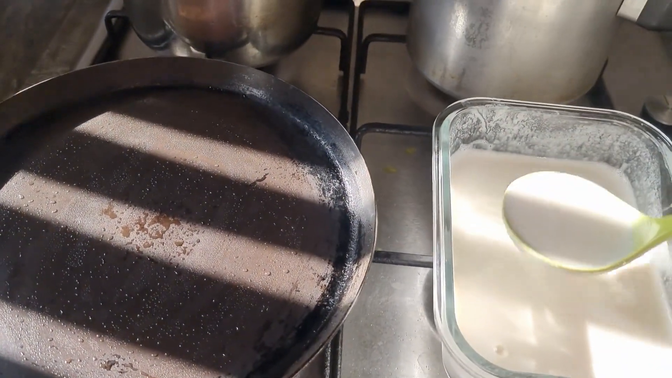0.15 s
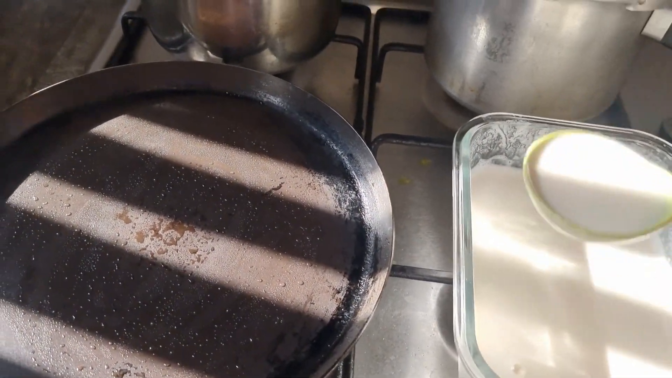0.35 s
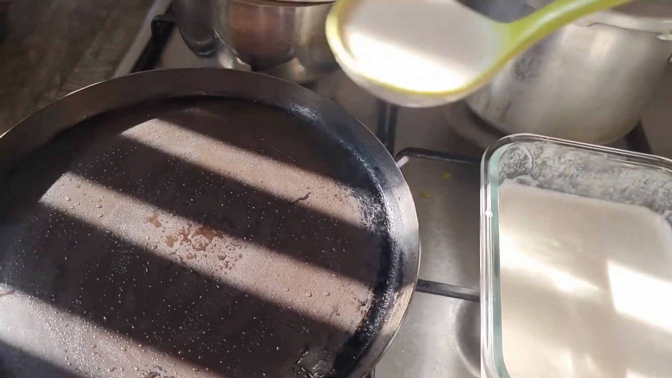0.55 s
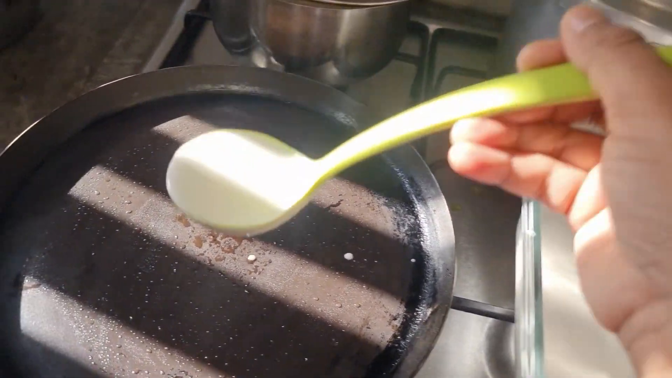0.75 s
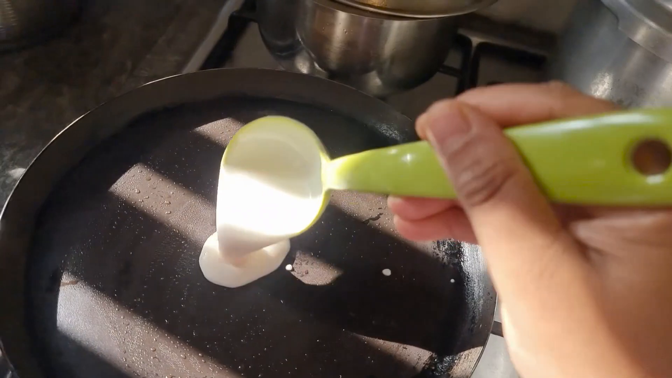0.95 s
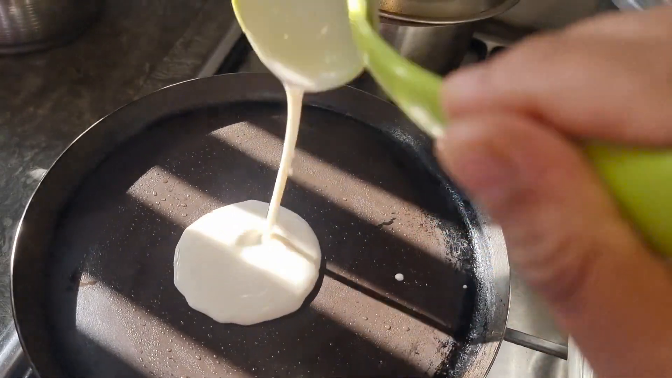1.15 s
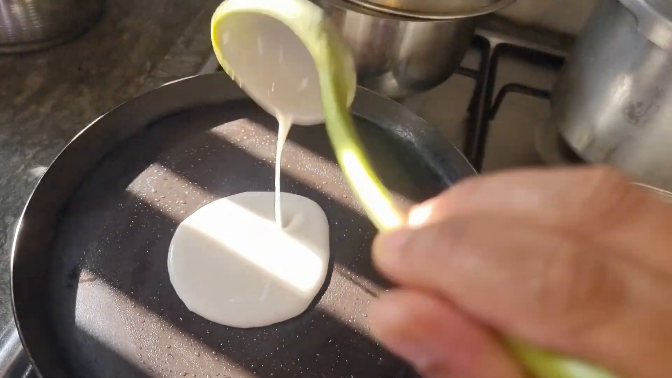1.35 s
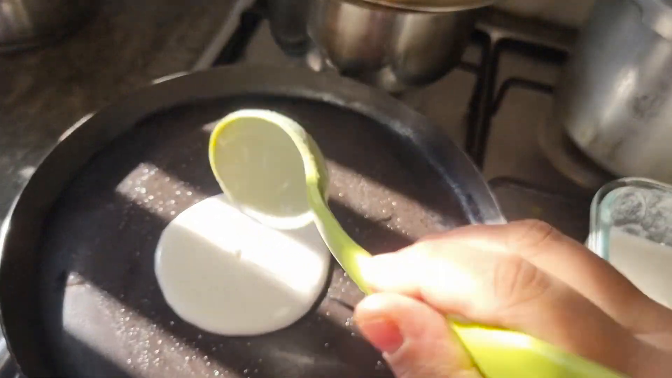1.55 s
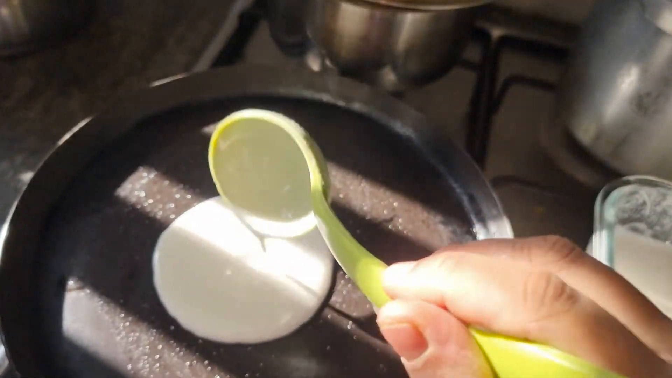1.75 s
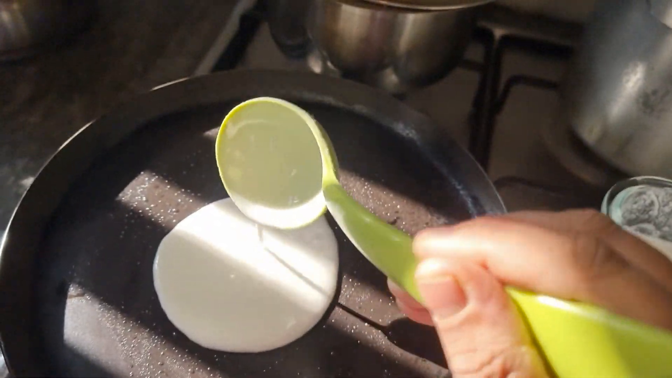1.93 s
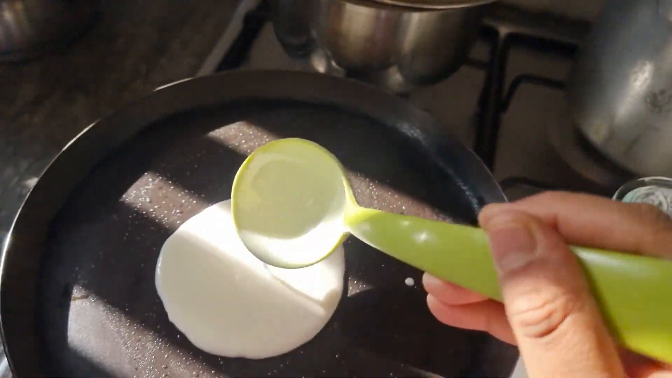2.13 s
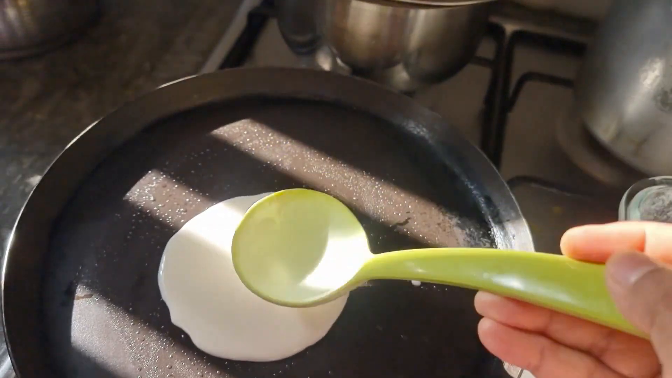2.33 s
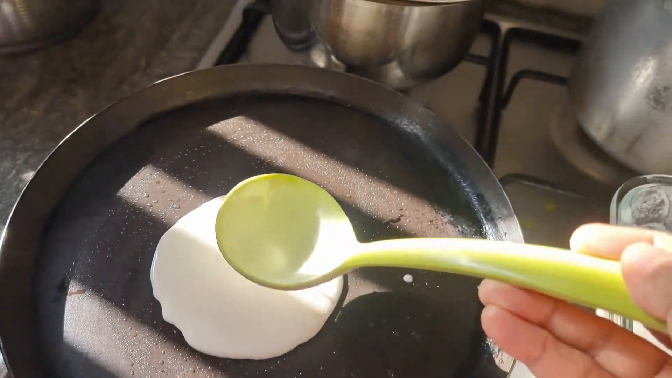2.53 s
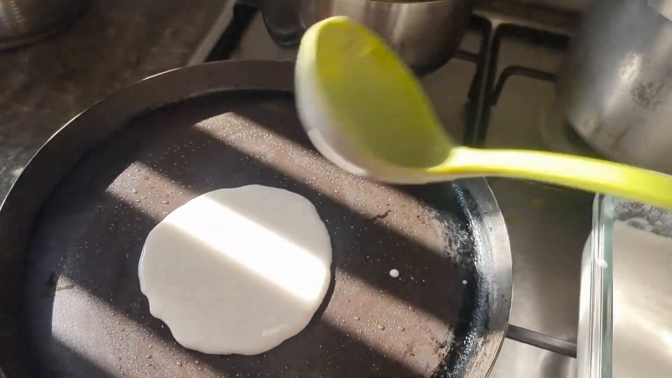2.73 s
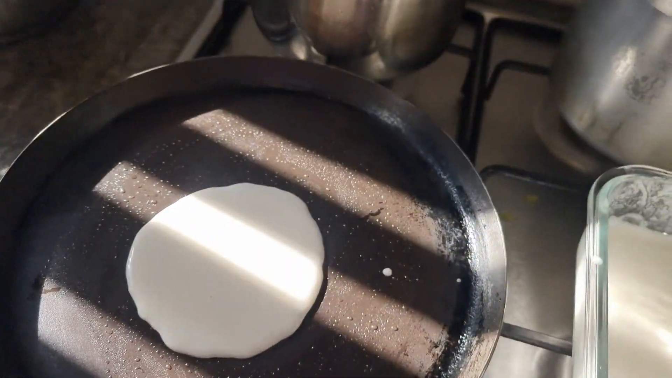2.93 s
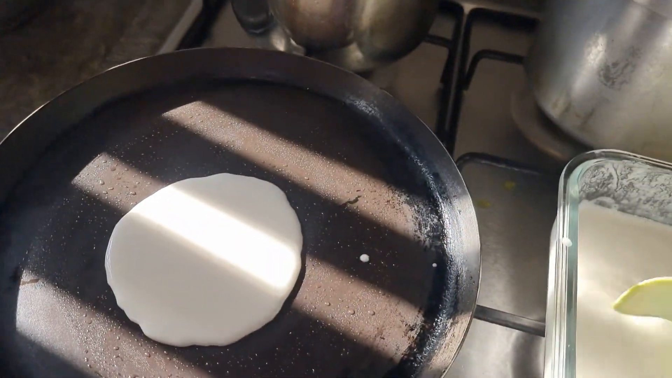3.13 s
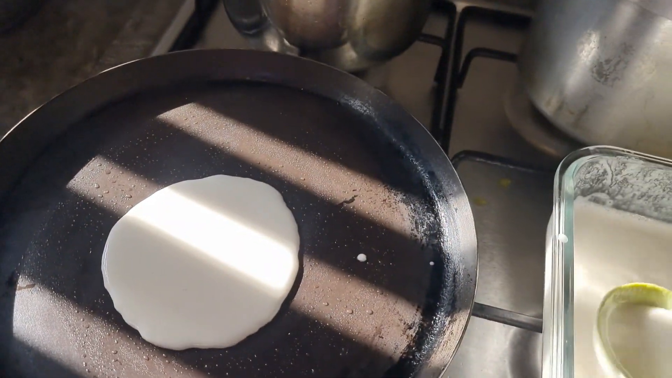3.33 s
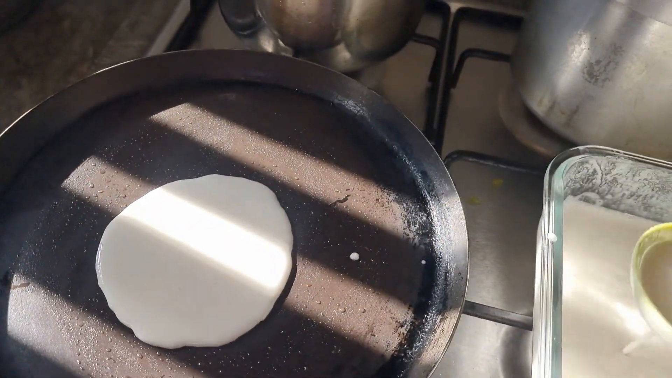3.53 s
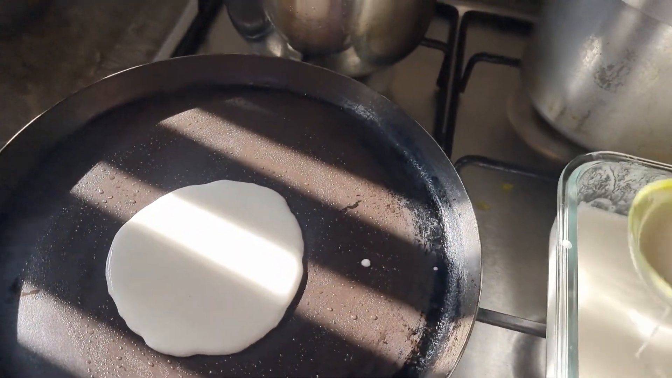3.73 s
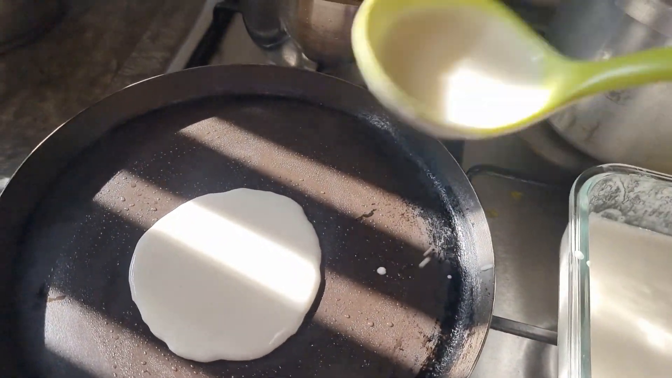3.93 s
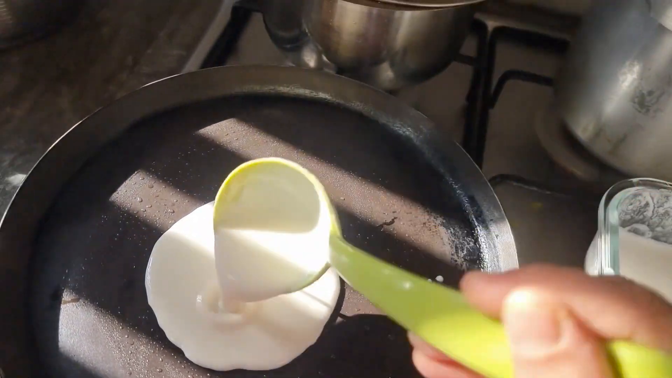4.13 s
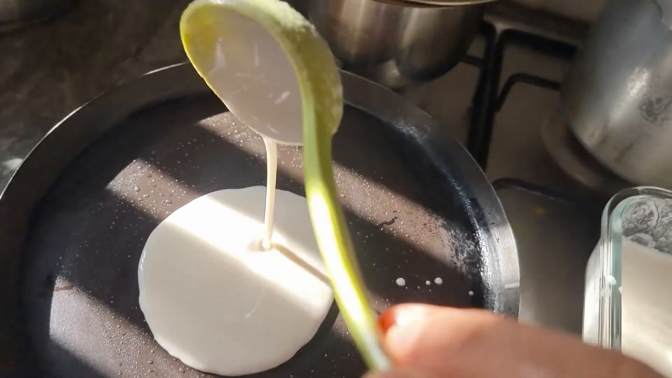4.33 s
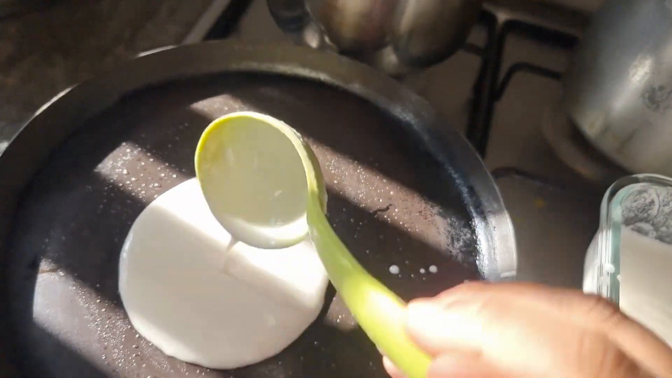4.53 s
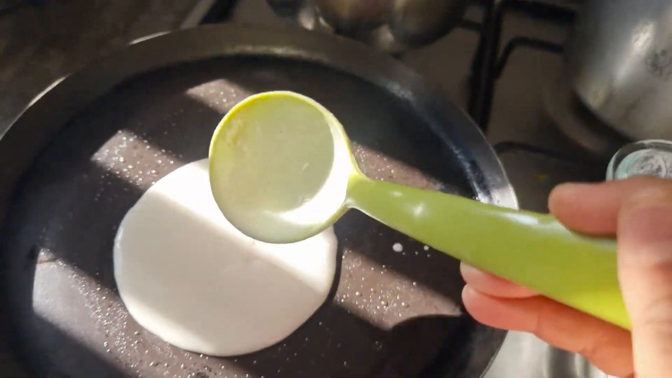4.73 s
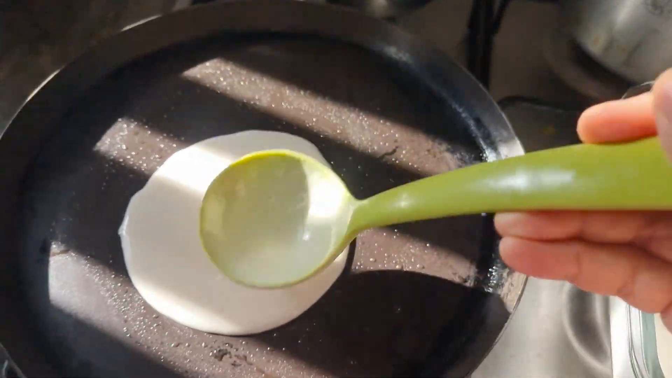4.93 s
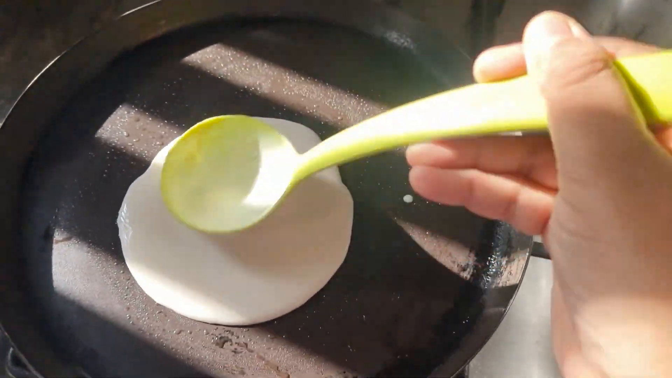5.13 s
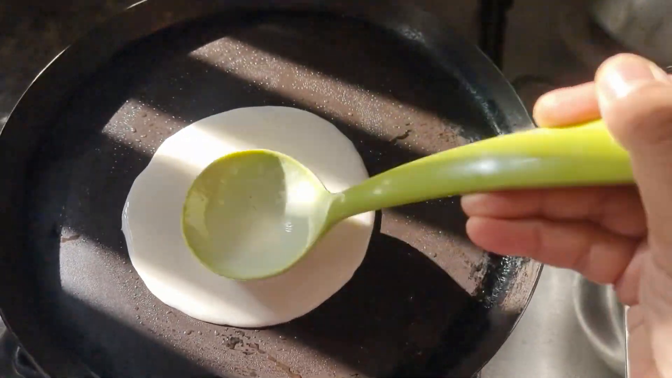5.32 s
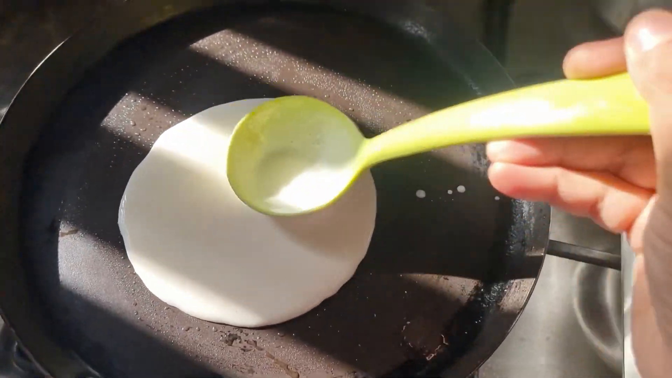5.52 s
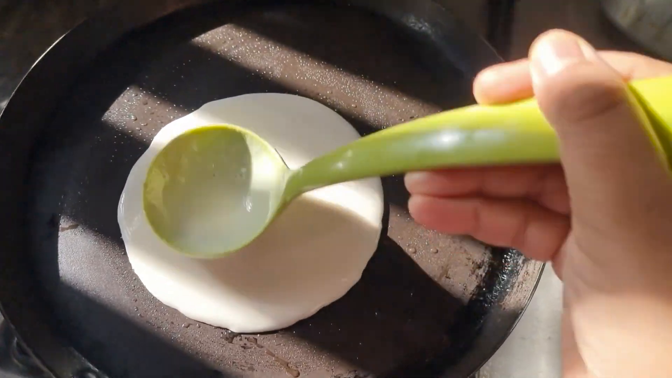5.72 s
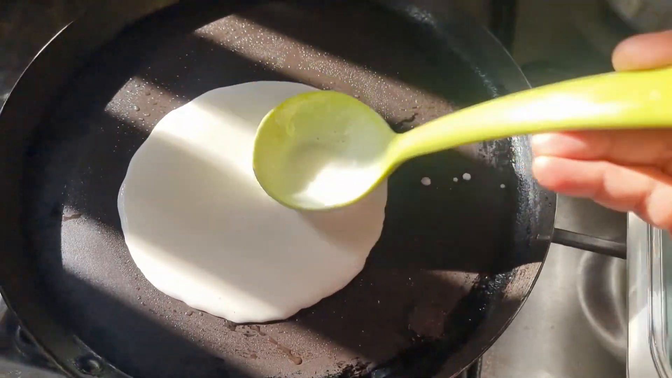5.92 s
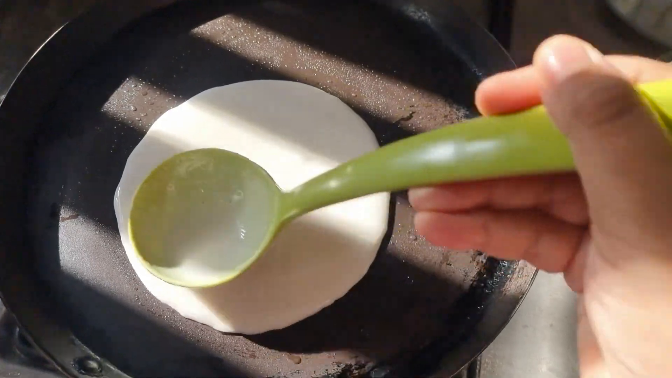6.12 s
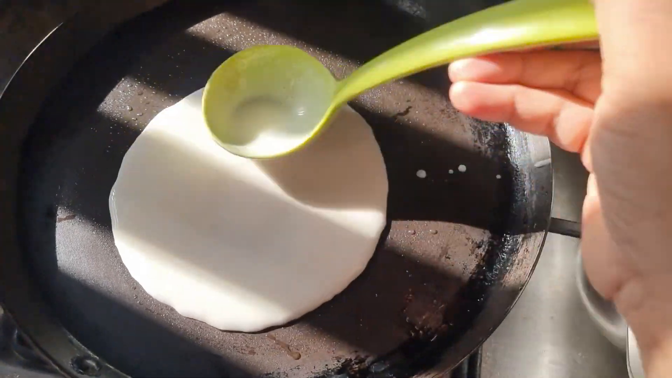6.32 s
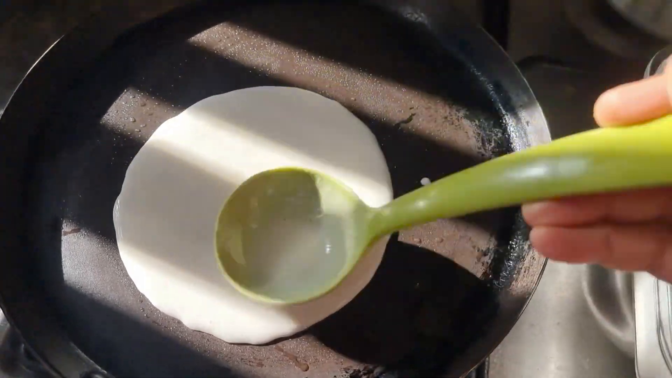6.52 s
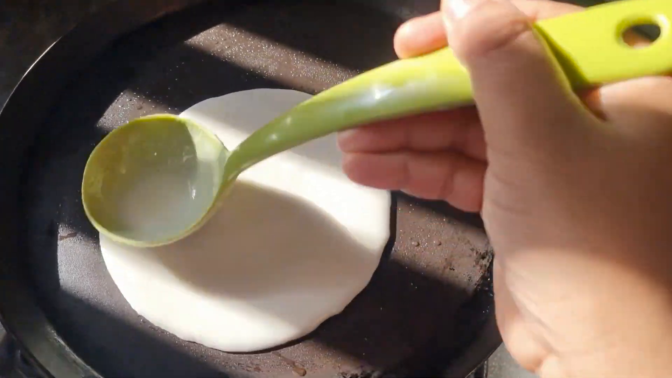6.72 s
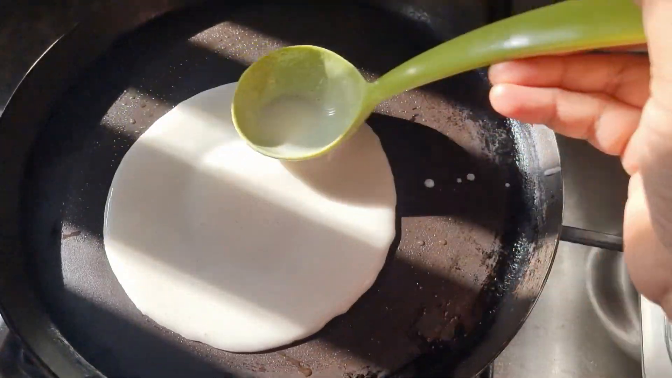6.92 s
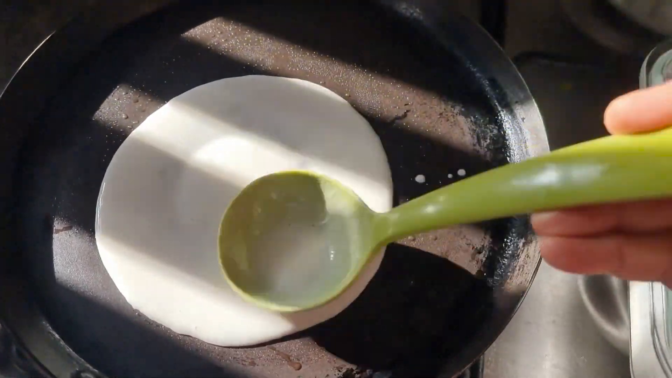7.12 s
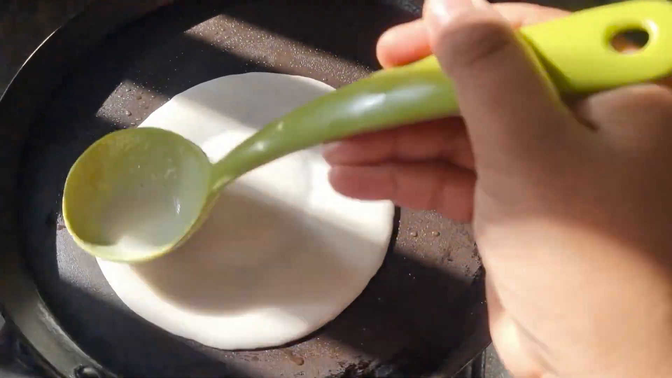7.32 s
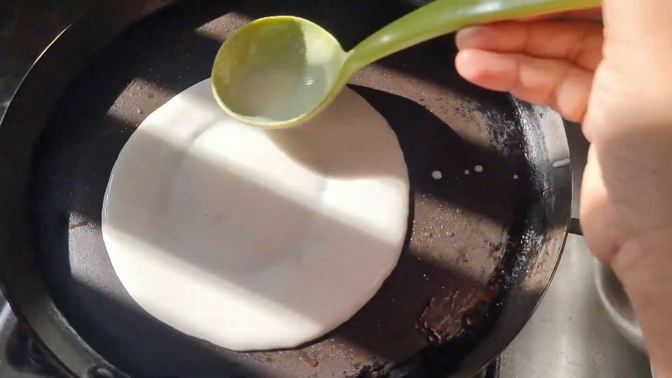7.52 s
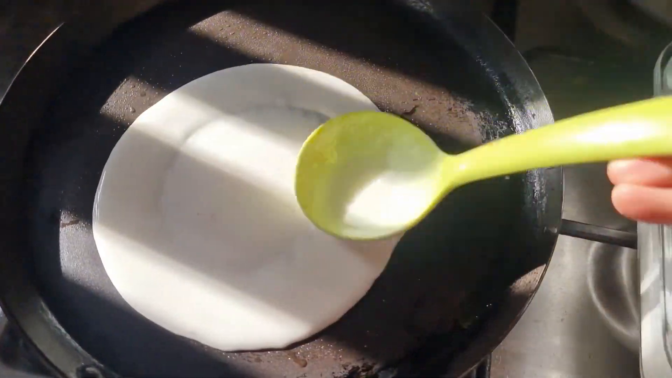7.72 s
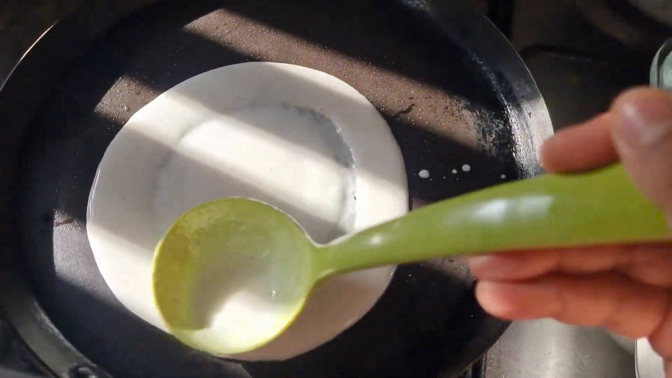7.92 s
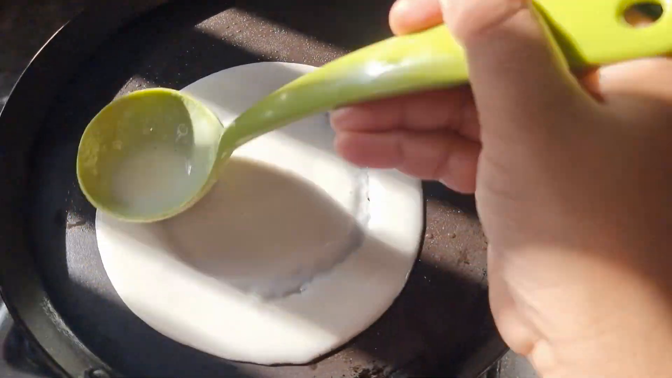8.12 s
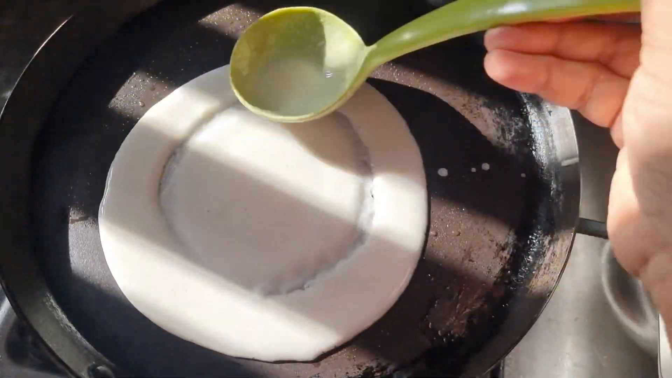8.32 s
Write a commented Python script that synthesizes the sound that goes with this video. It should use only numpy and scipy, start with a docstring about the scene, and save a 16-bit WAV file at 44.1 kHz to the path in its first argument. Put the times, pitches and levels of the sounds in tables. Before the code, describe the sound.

Batter pours onto a hot flat pan with a sudden bright sizzle that fades to crackle, swells with a second ladle, then pulses as it is spread.

```python
"""Batter sizzles on a hot flat pan: two ladles are poured and spread in circles.
Steam bursts from under it in thousands of tiny clicks that ring the pan and thin out as the batter sets;
each turn of the ladle pushes batter onto fresh metal and revives them. Single spits are louder cracks.
Filtered noise makes the faint gas burner underneath, and short decaying rings the knocks of ladle and dish.
Echoes of a small kitchen surround the sizzle and the spits, heard close up in stereo."""
import sys
import numpy as np
from scipy import signal
from scipy.fft import rfft, irfft, next_fast_len
from scipy.io import wavfile

SR = 44100
rng = np.random.default_rng(int(sys.argv[2]) if len(sys.argv) > 2 else 0)


def unload_audio(sound):
    """Save the sound as a 16-bit wav file, at the path given as the first command line argument."""
    columns = np.transpose(np.atleast_2d(sound))
    # keep every value between -1 and 1, then stretch to whole-number steps
    steps = np.round(np.clip(columns, -1, 1) * 32767)
    wavfile.write(sys.argv[1], SR, steps.astype(np.int16))


N = 373086
TIME = np.arange(N) / SR


def amp(db):
    """Turns decibels into a plain factor."""
    return 10 ** (np.asarray(db) / 20)


def evened(x):
    """Scales to an rms of 1."""
    return x / np.sqrt(np.mean(x ** 2) + 1e-20)


def read(points, hz):
    """Reads a table between its points, with pitch on a log axis as the ear hears it."""
    f, value = np.transpose(points)
    return np.interp(np.log(hz + 1), np.log(f + 1), value)


def add(mix, s, sound):
    """Mixes a sound in at time s."""
    part = mix[..., round(s * SR):][..., :sound.shape[-1]]
    part += sound[..., :part.shape[-1]]


def colour(x, points, size=4096):
    """Filters to the given spectrum without sounding early, so that clicks keep their sharp front."""
    log_gain = np.log(amp(read(points, abs(np.fft.fftfreq(size, 1 / SR)))))
    # the minimum-phase filter: all its energy comes as early as possible
    taps = np.fft.ifft(np.exp(signal.hilbert(log_gain).conj())).real[:size // 2]
    return np.apply_along_axis(lambda v: signal.oaconvolve(v, taps)[:len(v)], -1, x)


def resonate(x, hz, width_hz):
    """One damped mode, as a band-pass: the wider it is, the sooner it dies away."""
    return signal.lfilter(*signal.iirpeak(hz, hz / width_hz, SR), x)


def wander(per_s):
    """Slow random curve of rms 1 that turns about per_s times a second."""
    size = next_fast_len(N, real=True)
    hz = np.fft.rfftfreq(size, 1 / SR)
    slow = rfft(rng.standard_normal(size)) * np.exp(-(hz / per_s) ** 2)
    return evened(irfft(slow, size)[:N])


def bursts(per_s, spread_db):
    """Random clicks, many small and a few large; their power does not depend on their rate."""
    chance, sign = rng.random(N), rng.choice([-1., 1.], N)
    size = np.minimum(rng.exponential(1, N), 3.5)
    clicks = (chance < per_s / SR) * sign * amp(spread_db * size)
    return evened(clicks / np.sqrt(per_s))


# how long the kitchen's tail takes to fall by 60 dB: (f/Hz, t60/s)
ROOM_DECAY = [(210, 0.12), (1520, 0.14), (5050, 0.12), (15100, 0.26)]


def kitchen(x, near_db=3.0, near_s=0.0025, room_db=5.5):
    """One spot on the pan in stereo: direct sound, quick echoes off pots and hob, a short tail from the walls."""
    t = np.arange(SR // 5) / SR
    near, far = rng.standard_normal((2, 2, len(t)))
    near = near * (t > .0004) * np.exp(-t / near_s)
    near = colour(near, [(600, -25.0), (1500, -4), (4000, -3.5)])  # pots hardly reflect long waves
    hz, at, z = signal.stft(far * (t > .005), SR, nperseg=256)
    fade = amp(-60 * at / read(ROOM_DECAY, hz)[:, None])
    far = signal.istft(z * fade, SR, nperseg=256)[1][:, :len(t)]
    echo = amp(near_db) * near / np.linalg.norm(near[0]) + amp(room_db) * far / np.linalg.norm(far[0])
    echo[[0, 1], [rng.integers(2, 5), 0]] += 1  # direct sound, 2 to 4 samples later on the left
    return signal.oaconvolve(x[None], echo / np.linalg.norm(echo[0]), axes=1)[:, :len(x)]


# spectrum of the flame's rush: (f/Hz, level/dB)
FLAME_RUSH = [(21, -26), (50, -15.5), (80, 0), (102, -5), (148, 2), (228, -14.5), (292, -7.5), (455, -16),
              (605, -15), (1010, -16), (1710, -12.5), (2410, -16.5), (2850, -31), (5050, -33), (9100, -41),
              (12100, -50)]
# whistles of the gas jet: (f/Hz, nominal width/Hz, level/dB in each of two flame sounds)
JET_WHISTLES = [(1920, 19, -88), (2000, 64, -75.5), (2566, 35, -80), (3200, 70, -83), (6280, 59, -88.5)]


def burner(apart=0.59, rush_db=-69.5, right_db=-4.0):
    """The flame rushes and its jet whistles faintly: filtered noise, partly alike in both ears."""
    def flame():
        """Broad noise for the rush, narrow bands of another noise for the whistles."""
        noise = rng.standard_normal(N)
        whistles = sum(amp(db) * evened(resonate(resonate(noise, hz, 2 * w), hz, 2 * w))
                       for hz, w, db in JET_WHISTLES)
        return amp(rush_db) * evened(colour(rng.standard_normal(N), FLAME_RUSH)) + whistles
    shared, side = flame(), flame()
    return np.array([shared + apart * side, amp(right_db) * (shared - apart * side)])


# soft knocks of ladle and dish, and batter dripping back into it: (t/s, level/dB, f/Hz, t60/s)
SOFT_KNOCKS = [(.145, -72, 455, .35), (.398, -69, 310, .12), (.402, -73, 740, .1), (.425, -72, 410, .2),
               (.515, -71, 765, .18), (.559, -55, 680, .07), (.56, -62, 790, .06), (.56, -64, 480, .03),
               (.588, -68, 490, .1), (3.062, -54, 262, 0.21), (3.068, -56, 203, 0.2),
               (3.074, -58.5, 76, .2), (7.641, -61, 78.4, 0.17)]


def knocks(rise_s=0.0012, width=0.26, blur_db=-6):
    """Dull, cushioned blows, each a short ring blurred by the batter."""
    out, t = np.zeros(N), np.arange(SR // 3) / SR
    for s, db, hz, t60 in SOFT_KNOCKS:
        noise = rng.standard_normal(len(t))
        blur = evened(resonate(resonate(noise, hz, width * hz), hz, width * hz))
        ring = np.sin(2 * np.pi * hz * t) + amp(blur_db) * blur
        add(out, s, ring * amp(db - 60 * t / t60) * (1 - np.exp(-t / rise_s)))
    return out


SEAT_SHARE = 0.11  # share of each rise that the batter takes to seat on the metal


def swell(start_s, rise_s, fade_db_per_s):
    """Power grows with the wetted area, then fades as the batter sets."""
    age = TIME - start_s
    seated = np.clip(age / (SEAT_SHARE * rise_s), 0, 1) ** 2
    wetted = np.clip(age / rise_s, 0, 1) * seated
    return wetted * amp(-fade_db_per_s * np.maximum(age - rise_s, 0)) ** 2


# batter meets hot metal: three drips, the first ladle as it lands and as its pool widens, then the second
# (t/s, time to spread/s, level/dB, brightness/dB per octave)
BATTER_POURS = [(.6, .12, -38, 14), (.662, .02, -24.6, 10.5), (.765, .07, -16.2, 5.5), (.83, .25, -2.4, 2),
                (1.14, .17, -2.2, -.7), (4.35, .36, -6.3, 1.5)]
# the circling ladle pushes batter onto fresh metal: (t/s, level/dB, brightness/dB per octave)
LADLE_STROKES = [(5.23, .8, 1.6), (5.55, -.7, -.9), (6.1, -.6, .3), (6.5, -4, -.5), (7.2, -7.5, -.5),
                 (7.68, -2.5, 1), (7.92, -2.5, .5)]
STROKE_RISE_S, STROKE_FADE_DB_PER_S = 0.083, 4
# the ladle hovers over the pool and screens the treble: (t/s, half length/s, loss/dB at SHADE_HZ)
LADLE_SHADES = [(4.167, 0.12, 2), (5.1, 0.16, 2), (7.02, 0.12, 2.5)]
SHADE_HZ = 11800
# small bubbles; columns as for the other voices below. Brightness pivots on their pitch
SMALL_BUBBLES = (5200, 0.0, 1.0, -33, 9.5, -47)


def loudness(voice):
    """Gain of one voice of the sizzle: all pours and strokes add up in power."""
    hz, lag_s, slowness, pour_db, fade_db_per_s, stroke_db = voice
    octaves = np.log2(hz / SMALL_BUBBLES[0])
    poured = sum(amp(pour_db + db + tilt_db * octaves) ** 2
                 * swell(s + max(lag_s, 0), slowness * spread_s, fade_db_per_s)
                 for s, spread_s, db, tilt_db in BATTER_POURS)
    pushed = sum(amp(stroke_db + db + tilt_db * octaves) ** 2
                 * swell(s, STROKE_RISE_S, STROKE_FADE_DB_PER_S)
                 for s, db, tilt_db in LADLE_STROKES)
    shade_db = sum(loss_db * np.exp(-((TIME - s) / half_s) ** 2) for s, half_s, loss_db in LADLE_SHADES)
    return np.sqrt(poured + pushed) * amp(-shade_db * np.sqrt(hz / SHADE_HZ))


def steam(per_s, bubble_db=7, width_hz=480, count=11):
    """Each spot gives sharp snaps, and bubbles that ring for a few cycles at a pitch set by their size."""
    snaps, bubbles = bursts(per_s, spread_db=2.0), bursts(.5 * per_s, spread_db=4.0)
    spot = rng.integers(0, count, N)
    pitches = np.linspace(1300, 6200, count)
    return sum(kitchen(snaps * (spot == k) + amp(bubble_db) * resonate(bubbles * (spot == k), hz, width_hz))
               for k, hz in enumerate(pitches))


def blisters(per_s=220, low_hz=1700, high_hz=5600, ring_s=0.017, spread_db=2.5, count=3):
    """Larger steam pockets burst at random, each with a brief ping of its own pitch."""
    out, t = np.zeros((count, N)), np.arange(1500) / SR
    for k, (when, pitch, size, life) in enumerate(rng.random((int(per_s * N / SR), 4))):
        hz = low_hz * (high_hz / low_hz) ** pitch
        ping = np.sin(2 * np.pi * hz * t) * np.exp(-t / (ring_s * (.5 + life)))
        add(out[k % count], when * N / SR, amp(-spread_db * np.log(size + 0.036)) * ping)
    return evened(sum(kitchen(spot) for spot in out))


def glide(x, hz, width_hz):
    """A damped mode with steep skirts whose pitch follows the curve hz."""
    turn = np.exp(2j * np.pi * np.cumsum(hz) / SR)
    poles = np.exp(-np.pi * width_hz * np.array([1, 5]) / SR)
    # shift the mode down to 0 Hz, smooth it there and shift it back
    return (turn * signal.lfilter([1], np.poly(poles), x * turn.conj())).real


# stages of the pool, fresh, setting, refilled, spreading, thin: (t/s)
POOL_STAGES = [1.45, 2.9, 4.8, 5.9, 7.4]
# modes of the pan: (f/Hz at the start, width/Hz, creep/Hz per s, left-right likeness,
# then relative level/dB at each of the five stages)
PAN_MODES = [(681, 22, 0, .8, -24, -18, -28, -24, -19), (838, 30, 0, .8, -21, -16, -28, -25, -17),
             (1058, 24, 0, .8, -17.5, -13, -23, -21, -10), (1192, 25, 0, .4, -15, -8, -16, -14, -9),
             (1800, 80, 0, .5, -6.5, -11, -10, -12, -13), (2025, 70, 0, .5, -18, -10, -11, -7, -6),
             (2344, 70, 0, 0, -10, 0, -9, -9, -4), (2700, 70, 0, .5, -7, -6, -14, -13, -7),
             (2965, 100, 8, .8, 1, -2, -4, -2, -1), (3130, 90, 14, .6, -2, 2, -6, 3, 4),
             (3340, 60, 0, .5, -10, -6, -1, -12, -12), (4235, 50, 0, -.2, -8, -5, 0, -5, -12),
             (4340, 55, 4, -.3, -1.5, -1.5, 6.5, 4.5, -2), (5130, 65, 22, .1, -1.5, 1, 2, 2.5, -3),
             (5480, 80, 21, -.3, -9, -14, -2.5, -1.5, -12), (6270, 80, 25, 0, -5, -6, -11, -8, -6),
             (6890, 80, 0, 0, -20, -12, -8, -6, -12), (7680, 200, 30, 0, -8.5, -18, -16, -14, -20)]
# the level of each mode flutters at random, independently of the others
FLUTTER_PER_S, FLUTTER_DB = 28, 2.0


def pan_ring(per_s):
    """Bursts strike the pan; as the pool grows it favours other modes and some pitches creep upwards."""
    shared, side = bursts(per_s, spread_db=5.0), bursts(per_s, spread_db=12.0)
    ring = 0
    for hz, width, creep, alike, *stage_db in PAN_MODES:
        blows = np.sqrt(1 + alike) * shared + np.sqrt(1 - alike) * np.array([side, -side])
        flutter = np.interp(TIME * FLUTTER_PER_S, np.arange(400), rng.standard_normal(400))
        mode = glide(blows, hz + creep * TIME, width)
        level_db = np.interp(TIME, POOL_STAGES, stage_db) + FLUTTER_DB * flutter
        ring = ring + amp(level_db) * evened(mode)
    return evened(ring)


# spectra of the three parts of the sizzle: (f/Hz, level/dB)
SPUTTER_SPECTRUM = [(120, -45), (290, -27), (380, -24), (480, -10.5), (600, -12), (683, -6.5), (750, -8.5),
                    (830, -3.5), (910, -15), (985, -18), (1058, 5), (1120, -11), (1192, 2), (1300, -2.5),
                    (1670, -1.5), (2000, -40), (3000, -46)]
HISS_SPECTRUM = [(1020, -74), (1560, -19), (1800, -7), (2150, -3.5), (2340, -2), (2500, -4), (2700, 0),
                 (3050, -1.5), (3600, -2.5), (4150, -1), (4570, -5.5), (4800, -4.5), (5000, -3),
                 (5550, -3.5), (6000, -6), (7300, -7), (8500, -16), (12000, -43.5)]
FIZZ_SPECTRUM = [(4200, -45.5), (6900, -32), (7800, -5), (9000, -1.5), (11000, 1), (13000, -1.5),
                 (15800, -3.5)]
# fine fizz answers first; larger and lower bubbles follow as the layer thickens. Each voice:
# (centre f/Hz, lag/s with below 0 as none, rise/spreading times, pour level/dB, fade/dB per s, stroke level/dB)
FINE_FIZZ = (11005, 0.0, 0.8, -41, 4.5, -50.5)
LARGE_BUBBLES = (2697, -0.04, 2.5, -32, 6, -44.5)
LOW_SPUTTER = (1100, -0.19, 2.2, -44, 4, -52.5)
RINGING_PAN = (4300, 0.15, 1.6, -30.5, 7, -50.5)
# bursts come faster in a stronger boil: FULL_PER_S is added to the least rate when small bubbles reach FULL_DB
FULL_PER_S, FULL_DB, DB_PER_TENFOLD, LEAST_PER_S = 16000, -33.5, 10.5, 1000
SURGES_PER_S = 9  # steam escapes from under the batter in surges


def sizzle(clump_db=0.49, surge_db=0.45, fizz_clump_db=-0.9, sputter_clump_db=1.15,
           split_hz=4100, blister_db=-7.5, dry_db=-9.0):
    """Steam escapes in clumps; fresh batter on bare metal makes finer bubbles and sets the pan ringing."""
    boil = loudness(SMALL_BUBBLES)
    per_s = LEAST_PER_S + FULL_PER_S * (boil / amp(FULL_DB)) ** (20 / DB_PER_TENFOLD)
    uneven = (per_s.mean() / per_s) ** (1 / 4)  # a thin boil comes in clearer clumps
    clumps = amp(uneven * (clump_db * wander(57) + surge_db * wander(SURGES_PER_S)))

    pops = steam(per_s)
    hiss = evened(colour(pops, HISS_SPECTRUM))
    hiss = hiss + amp(blister_db) * evened(colour(blisters(), HISS_SPECTRUM))
    highpass = signal.firwin(31, split_hz, pass_zero=False, fs=SR)
    small = signal.oaconvolve(hiss, highpass[None], "same")
    large = hiss - small
    body = boil * evened(small) + loudness(LARGE_BUBBLES) * evened(large)
    body = body + loudness(RINGING_PAN) * pan_ring(per_s)

    sputter = evened(colour(steam(per_s), SPUTTER_SPECTRUM))
    sputter = loudness(LOW_SPUTTER) * amp(sputter_clump_db * wander(8.4)) * sputter

    snaps = kitchen(bursts(0.046 * per_s, spread_db=8.0), near_db=-10, room_db=-4)
    spray = evened(pops) + amp(dry_db) * uneven * snaps  # drying batter snaps sharply
    fizz = loudness(FINE_FIZZ) * amp(fizz_clump_db * wander(120)) * evened(colour(spray, FIZZ_SPECTRUM))
    return clumps * (sputter + body + fizz)


# single large spits: (t/s, level/dB, low share/dB, treble share/dB)
LARGE_SPITS = [(0.667, -42, -8, -13), (0.689, -36, -10, -12), (0.711, -37, -10, -12), (0.81, -31, -4, -18),
               (0.856, -25, -4, -11), (1.847, -14, -2, -24), (2.482, -18, -2, -26), (2.823, -18, -8, -18),
               (3.098, -19, -5, -15), (3.181, -22.5, 4, -30), (3.525, -18, 0, -15), (3.562, -19, -3, -11),
               (3.648, -17.5, 7, -26), (3.777, -24, 0, -25), (3.847, -19, -5, -9), (3.916, -22.5, 0, -12),
               (3.955, -22.5, 0, -14), (3.973, -24, 0, -17), (4.027, -19.5, -3, -13), (4.11, -20.5, 5, -19),
               (4.139, -26, 4, -28), (4.209, -26, 8, -13), (4.282, -27, 2, -20), (4.72, -22.5, 7, -30),
               (5.248, -18.5, 1, -32), (5.28, -20, 4, -26), (7.291, -25, 12, -26), (7.682, -24.5, 3, -28),
               (7.735, -22.5, 2, -28), (7.762, -21, -2, -26), (7.808, -23.5, 11, -26),
               (7.821, -22.5, 13, -26), (7.94, -22.5, -2, -25), (7.997, -23.5, 3, -26),
               (8.069, -23.5, 7, -24), (8.265, -22, -5, -6)]
# spectrum of a spit below the treble: (f/Hz, level/dB)
CRACK_SPECTRUM = [(150, -56), (450, -27.5), (920, -24.5), (1240, -17), (3010, -2), (5510, -16)]
SPRAY_PER_TREBLE = .6  # the drier a blister, the more steam follows: dB of spray per dB of treble share


def spits(spray_db=-12, spray_s=0.0043):
    """A large blister cracks and lets out a brief spray of steam: a dull pop when wet, a bright tick when dry."""
    out, t = np.zeros((2, N)), np.arange(4096) / SR
    for s, db, low_db, treble_db in LARGE_SPITS:
        spray = rng.standard_normal(len(t)) * np.exp(-t / spray_s)
        crack = (t == 0) + amp(spray_db + SPRAY_PER_TREBLE * treble_db) * spray
        crack = colour(crack, CRACK_SPECTRUM + [(8510, treble_db)])
        crack = colour(crack, [(1300, low_db), (3000, 0)])
        crack = kitchen(crack, near_db=-6, room_db=-2)
        add(out, s, amp(db) * crack / abs(crack).max())
    return out


# crackle at the rim; columns as for the other voices
RIM_CRACKLE = (3000, 0.77, 4, -41.5, 3.5, -53.5)
# spectrum of the crackle below the treble: (f/Hz, level/dB)
RIM_SPECTRUM = [(120, -46), (200, -27), (330, -27.5), (550, -22), (940, -25), (1150, -10.5), (3100, -10),
                (4200, -12), (4600, -7), (5000, -14), (5500, -5), (7000, -9.5)]


def crackle(per_s=130, treble_db=-19, count=3):
    """Small dry spits all round the rim fade more slowly than the boil."""
    cracks = sum(kitchen(bursts(per_s / count, spread_db=3.0), near_db=-7.5, room_db=1.5)
                 for spot in range(count))
    return loudness(RIM_CRACKLE) * evened(colour(cracks, RIM_SPECTRUM + [(8510, treble_db)]))


# lower edge of the boil: it sinks as the pool thickens and its bubbles grow: (t/s, f/Hz)
BOIL_LOW_EDGE = [(.85, 2000), (.97, 950), (1.15, 600), (1.7, 420), (2.3, 200)]


def thicken(x, order=4):
    """A thin film holds only small bubbles, so the low notes come in late."""
    hz, at, z = signal.stft(x, SR, nperseg=512)
    edge_hz = np.interp(at, *np.transpose(BOIL_LOW_EDGE))
    low_cut = np.sqrt(1 + (edge_hz / (hz[:, None] + 1)) ** (2 * order))
    return signal.istft(z / low_cut, SR, nperseg=512)[1][:, :N]


# left minus right gain of everything but the burner: (f/Hz, level/dB)
LEFT_RIGHT_BALANCE = [(310, 5), (560, 5.5), (810, 1.5), (1210, 4), (2520, 4.5), (4020, 6.5), (5220, 5.5),
                      (6520, 5), (8020, 0.5), (9520, -2), (11520, 0.5), (15020, 3)]


def scene(pan_db=-0.5):
    """The left port of the microphone faces the pan more openly than the right; the burner joins after that."""
    left, right = amp(pan_db) * thicken(sizzle() + crackle()) + spits() + knocks()
    left = colour(left, [(hz, db / 2) for hz, db in LEFT_RIGHT_BALANCE])
    right = colour(right, [(hz, -db / 2) for hz, db in LEFT_RIGHT_BALANCE])
    return np.array([left, right]) + burner()


EDGE_HZ = 15850


def record(dry):
    """A steep low-pass removes everything above EDGE_HZ."""
    lowpass = signal.firwin(801, EDGE_HZ, window=("kaiser", 9), fs=SR)
    return signal.oaconvolve(dry, lowpass[None], "same")


dry = scene()
out = record(dry)
unload_audio(out)
```